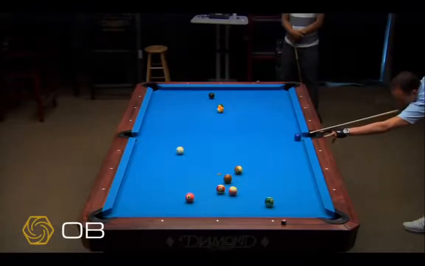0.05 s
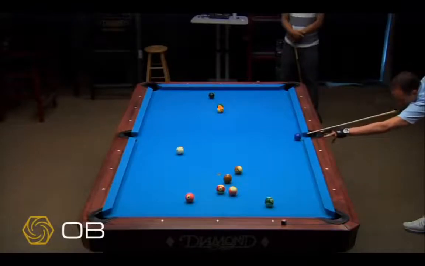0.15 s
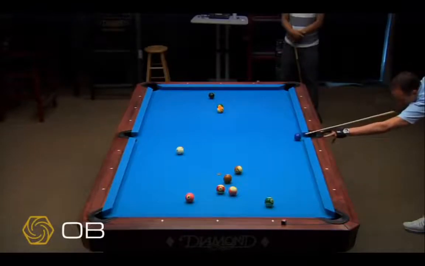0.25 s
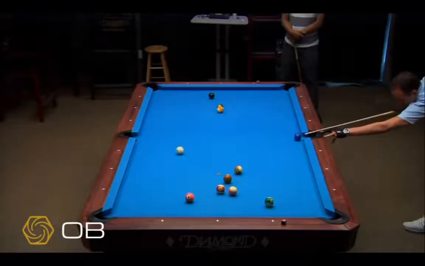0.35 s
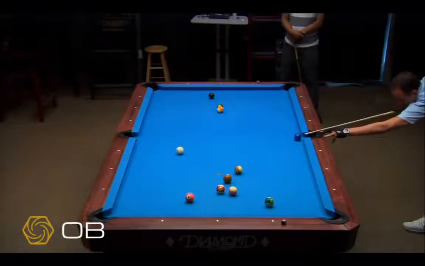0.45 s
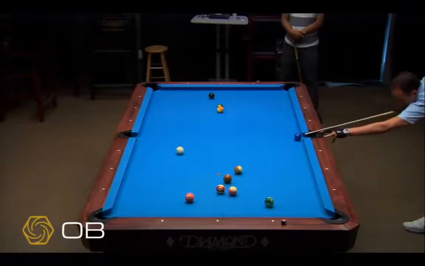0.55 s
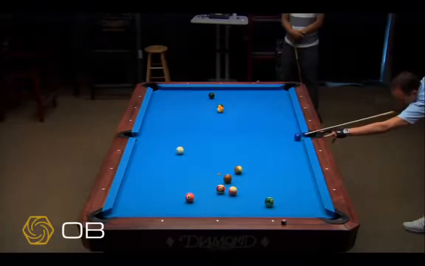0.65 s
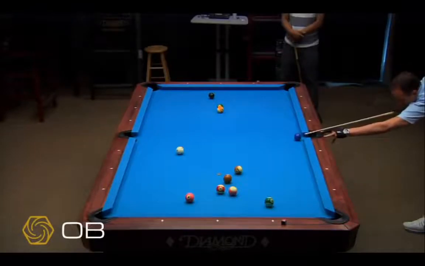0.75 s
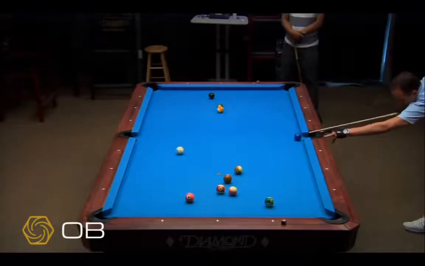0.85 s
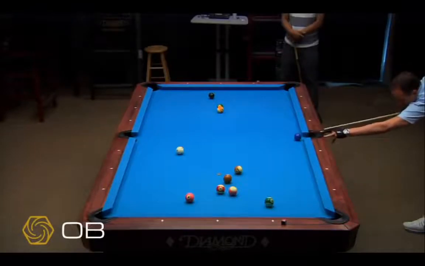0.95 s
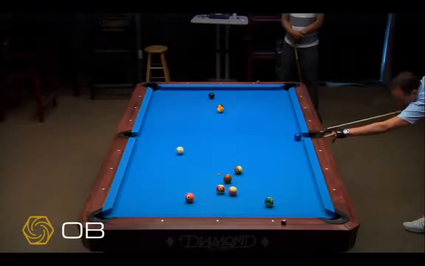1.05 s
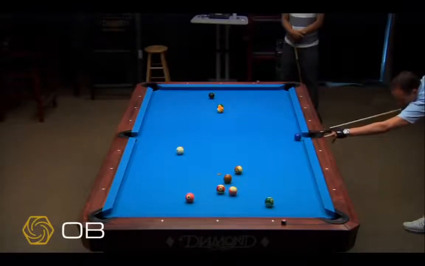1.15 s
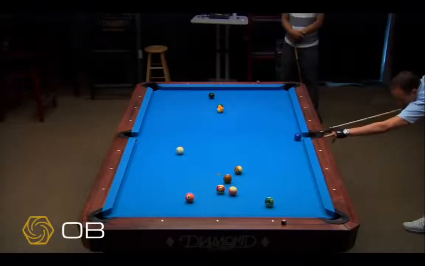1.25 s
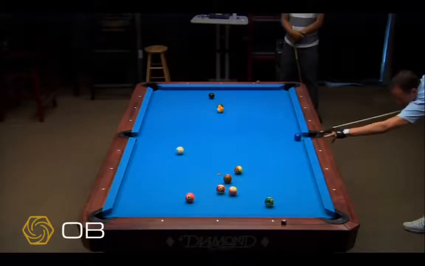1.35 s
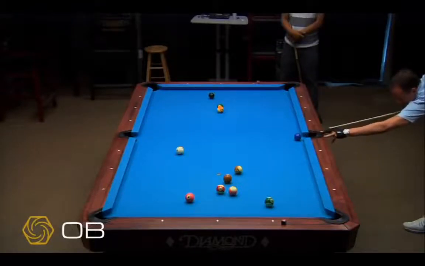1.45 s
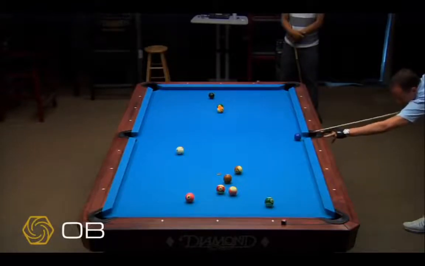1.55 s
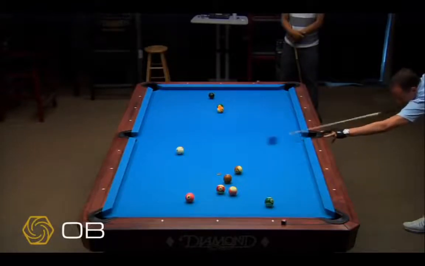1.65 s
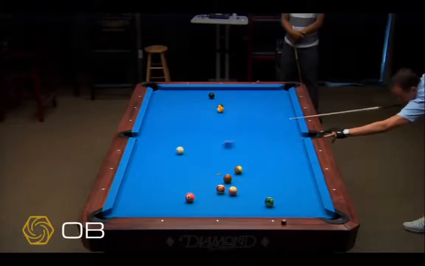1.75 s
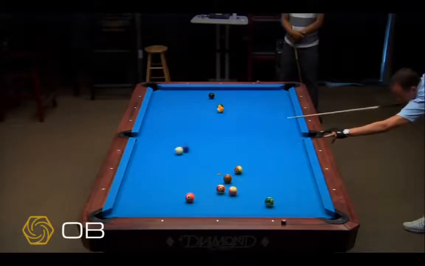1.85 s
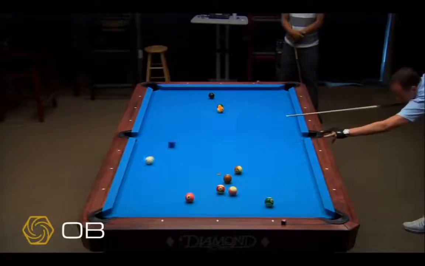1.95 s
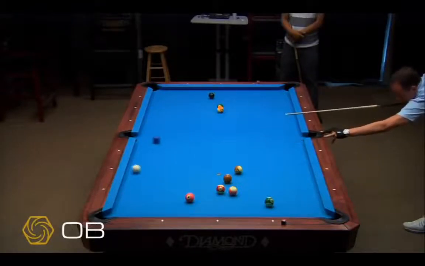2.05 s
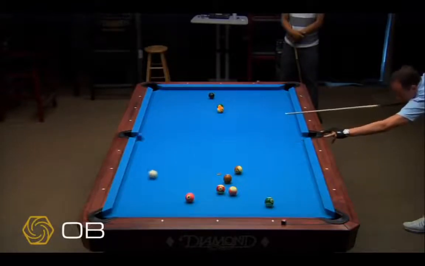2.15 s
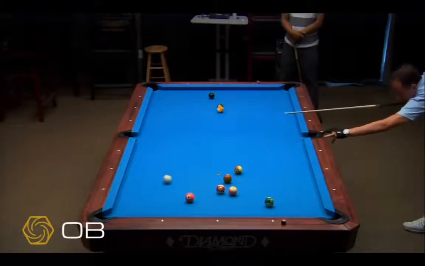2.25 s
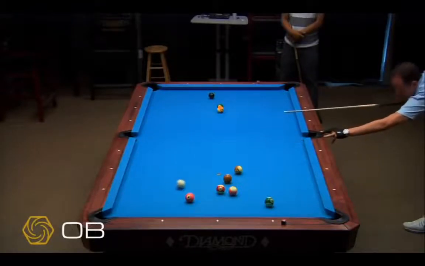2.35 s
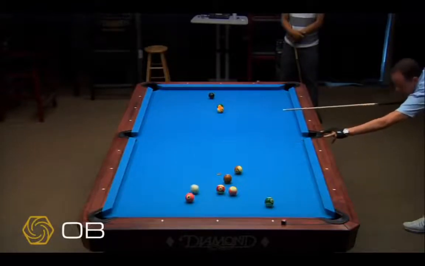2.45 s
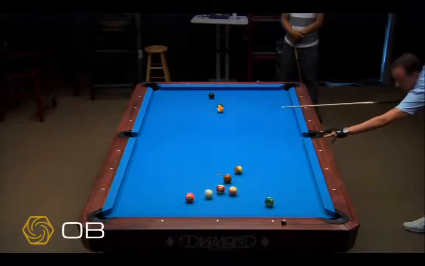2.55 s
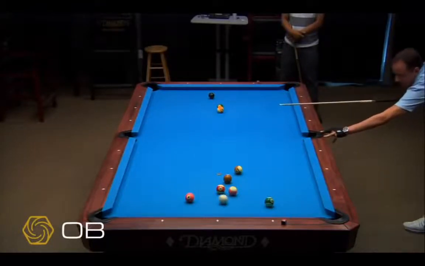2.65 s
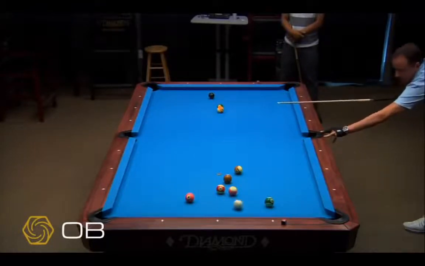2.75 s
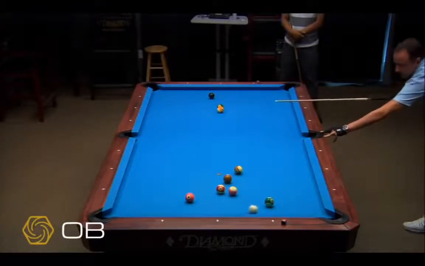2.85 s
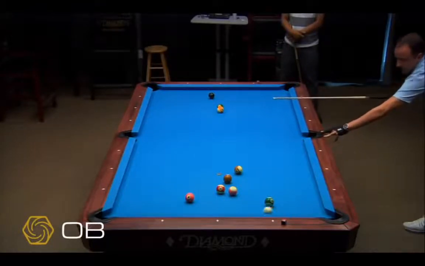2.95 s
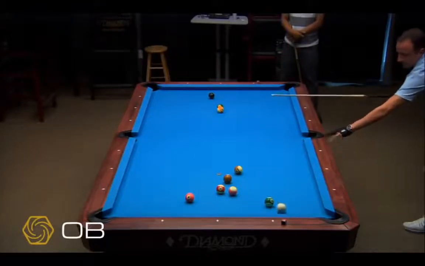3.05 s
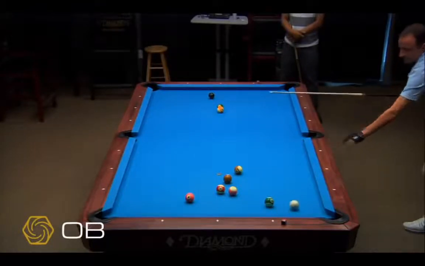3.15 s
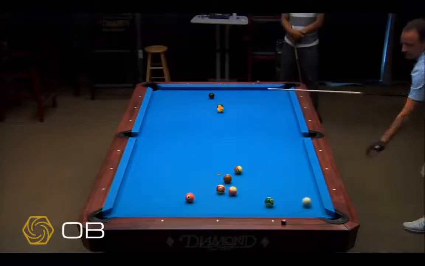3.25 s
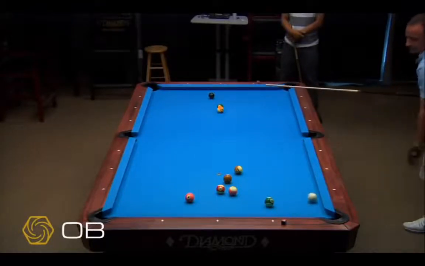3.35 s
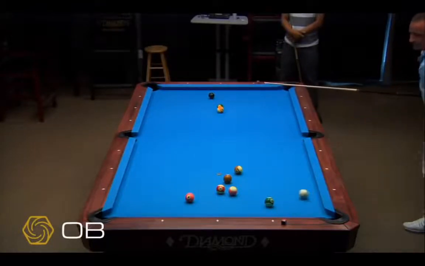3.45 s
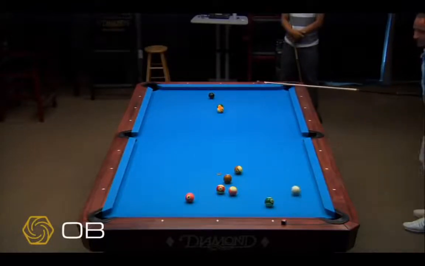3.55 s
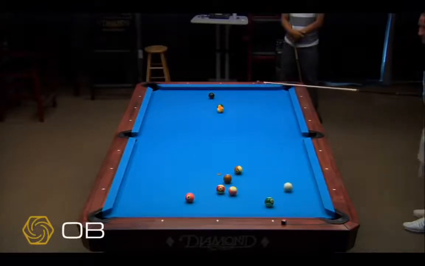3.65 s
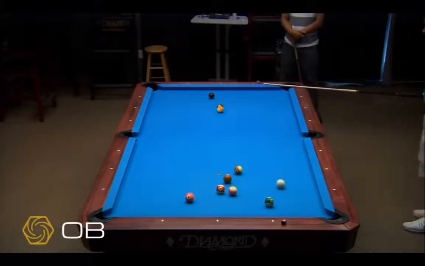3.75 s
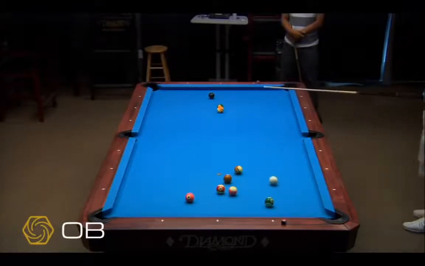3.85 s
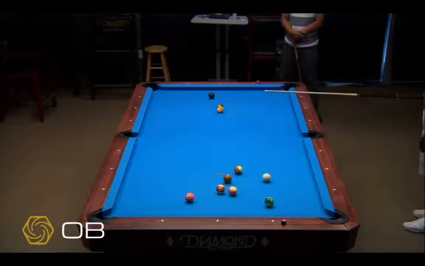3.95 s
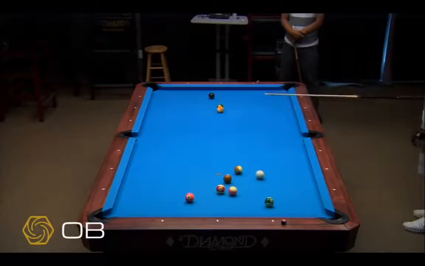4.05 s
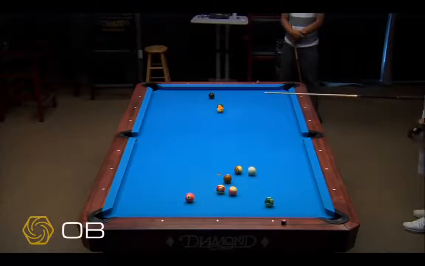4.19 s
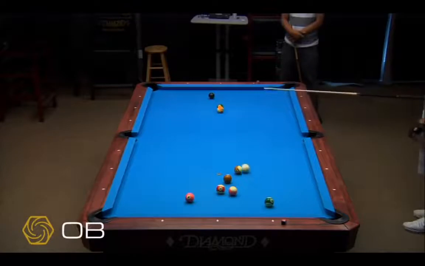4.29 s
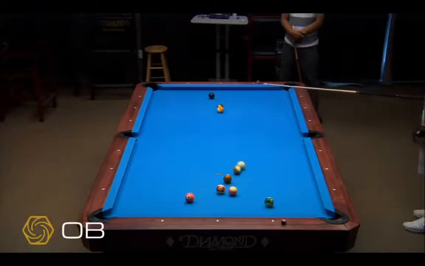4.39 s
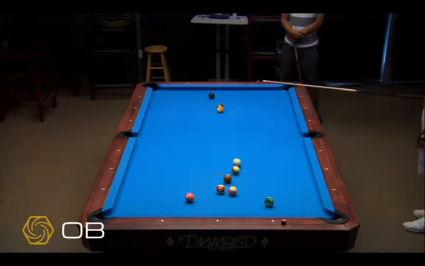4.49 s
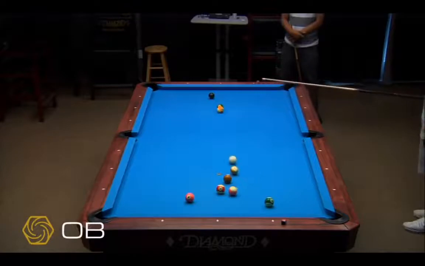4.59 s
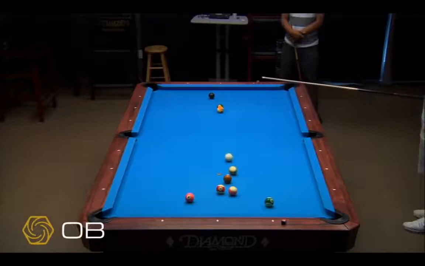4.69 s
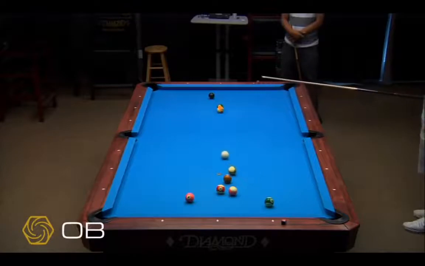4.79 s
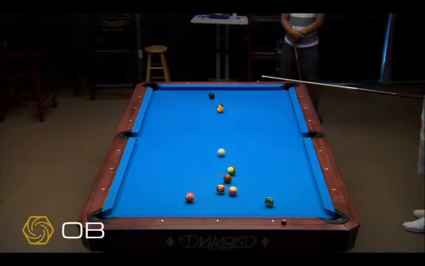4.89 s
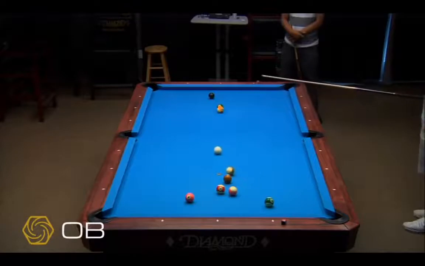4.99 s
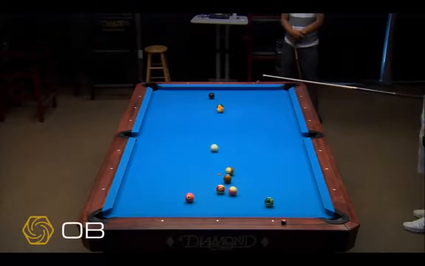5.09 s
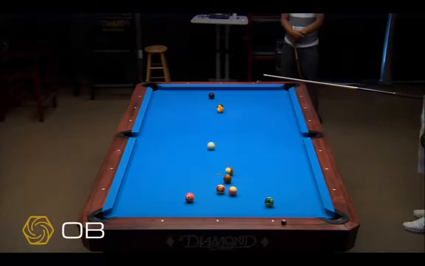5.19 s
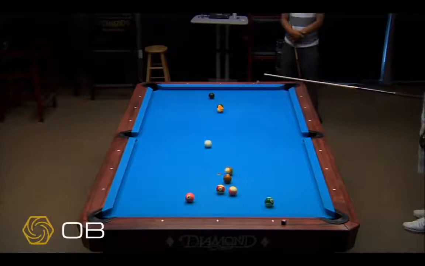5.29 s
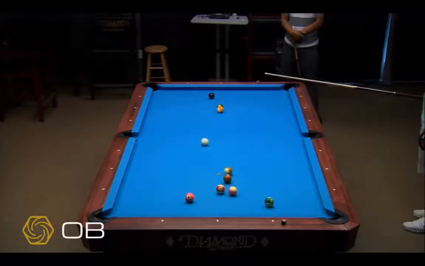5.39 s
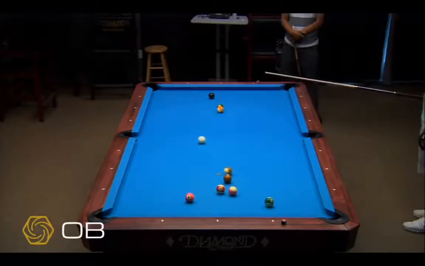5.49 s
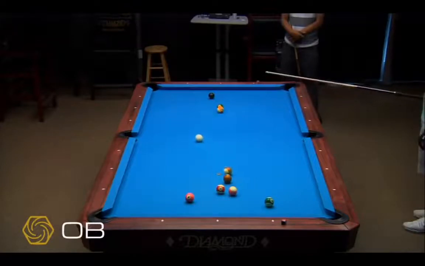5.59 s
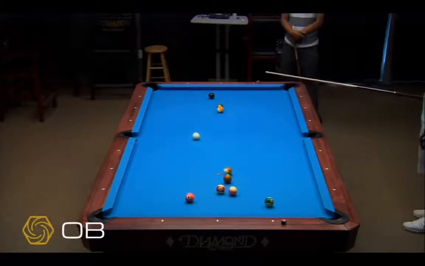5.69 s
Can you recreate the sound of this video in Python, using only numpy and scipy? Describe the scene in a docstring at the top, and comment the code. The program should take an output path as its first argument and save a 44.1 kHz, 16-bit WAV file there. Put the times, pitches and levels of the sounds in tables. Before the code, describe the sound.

Fabric scrapes and snaps right against a clip-on shirt microphone, then a cue hits a pool ball, followed at once by a bright clack of ball on ball. Hollow wooden knocks and a low rumble follow as a ball falls into the pocket and travels through the table. It settles in the tray with soft clacks and a hollow tone, before a last faint click. Quiet room air and electrical hum lie underneath.

```python
"""A pool room heard through a small microphone worn on a player's shirt. Air hush and mains hum run throughout.
First cloth rustles, squeaks and ticks against the capsule by stick-slip friction. At 1.8 s the cue strikes
and its shaft rings; just after 2 s two balls clack. Meanwhile a ball starts to knock and rumble, into the
pocket and down the wooden return, driving the table's modes until 4.3 s. Near 4.5 s come softer clacks,
two knocks and a hollow ring as it lands in the tray; one faint clack follows at 5.5 s."""
import sys
import numpy as np
from scipy import signal
from scipy.fft import rfft, irfft
from scipy.io import wavfile
from scipy.ndimage import uniform_filter1d

SR = 44100
rng = np.random.default_rng(int(sys.argv[2]) if len(sys.argv) > 2 else 0)


def transcribe(signal):
    """Save signal, clipped to [-1, 1], as a 16-bit WAV file at the path in sys.argv[1]."""
    frames = np.atleast_2d(signal).T
    limited = np.clip(frames, -1, 1)
    pcm = np.round(limited * 32767).astype(np.int16)
    wavfile.write(sys.argv[1], SR, pcm)


N = 252693


def undb(db):
    """Amplitude ratio of a level in decibels."""
    return 10 ** (np.asarray(db) / 20)


def unit(x):
    """Normalisation to a peak of 1."""
    return x / np.max(np.abs(x))


def rms(x, db):
    """Normalisation to an RMS level."""
    return x * undb(db) / np.sqrt(np.mean(x ** 2))


def add(track, start, x):
    """Superposition: x joins the track at start seconds."""
    i = max(int(start * SR), 0)
    track[i:i + len(x)] += x[:N - i]


def band(x, lo_hz, hi_hz):
    """Butterworth band-pass filtering."""
    sos = signal.butter(2, [lo_hz, min(hi_hz, .45 * SR)], "bandpass", fs=SR, output="sos")
    return signal.sosfilt(sos, x)


def ring(x, modes):
    """Modal superposition: damped resonators of alternating sign, driven by x."""
    out = 0
    for k, (hz, db, t60) in enumerate(modes):
        pole = np.exp(2j * np.pi * hz / SR - np.log(1000) / (t60 * SR))
        out = out + (-1) ** k * undb(db) * signal.lfilter([1], [1, -pole], x).imag
    return out


def colour(x, points):
    """Spectral shaping by (frequency [Hz], gain [dB]) points."""
    hz, db = np.transpose(points)
    bins_hz = np.arange(len(x) // 2 + 1) * SR / len(x) + 1
    return irfft(rfft(x) * undb(np.interp(np.log(bins_hz), np.log(hz), db)), len(x))


def drift(rate_hz):
    """Smoothed random steps: a slow fluctuation with spread near 1."""
    hold = int(SR / rate_hz)
    steps = np.repeat(rng.standard_normal(N // hold + 1), hold)
    return 1.2 * uniform_filter1d(uniform_filter1d(steps, hold), hold)[:N]


def swell(t, rise, t60):
    """Exponential build-up with time constant rise, and decay by 60 dB in t60 seconds."""
    return (1 - np.exp(-t / max(rise, 1e-4))) ** 2 * np.exp(-np.log(1000) * t / max(t60, 1e-3))


def burst(t, rise, t60):
    """A transient of white noise that builds up and decays."""
    return rng.standard_normal(len(t)) * swell(t, rise, t60)


# spectrum of the room's air noise (frequency [Hz], relative density [dB])
AIR_SPECTRUM = [(30, -16.5), (80, -13), (140, -9.5), (190, -13), (230, -23.5), (330, -20), (450, -27),
                (1000, -26.5), (1300, -42), (2200, -37.5), (3000, -45.5), (4700, -49.5), (7500, -41.5),
                (10000, -49.5), (13000, -43.5), (15700, -46), (16200, -70)]
def hush():
    """Ambient noise: broadband, strongest in the bass, drifting slightly in level."""
    air = colour(rng.standard_normal(N), AIR_SPECTRUM)
    air = air * undb(-73) / np.std(band(air, 190, 16000))
    return air * undb(.9 * drift(3.4))


HUM_HZ, HUM_DB = 118.5, -64
def hum():
    """Mains hum: one sinusoid under slight random frequency and amplitude modulation."""
    phase = 2 * np.pi * np.cumsum(HUM_HZ + .5 * drift(4)) / SR
    return rms(np.sin(phase) * undb(1.2 * drift(4)), HUM_DB)


# cloth sliding past the capsule, one contour a slide (time [s], level [dB])
SLIDES = [
    [(0, -64.5), (.14, -71), (.155, -80), (.24, -62), (.28, -67), (.56, -77), (.66, -99)],
    [(.82, -95), (.93, -77), (.96, -57), (.995, -56), (1.01, -75), (1.06, -75), (1.09, -99)],
    [(1.275, -74), (1.345, -53.5), (1.38, -69.5), (1.4, -55), (1.49, -69.5), (1.55, -57.5), (1.565, -65),
     (1.62, -69.5), (1.68, -95)],
]
# spectrum of cloth friction (frequency [Hz], relative density [dB])
CLOTH_SPECTRUM = [(900, -27.5), (1400, -10), (2300, -6.5), (3000, -16), (4400, -25.5), (5500, -8),
                  (6400, -1.5), (8500, -1.5), (10000, -16), (11600, -3.5), (14000, -3), (15800, -8.5),
                  (16500, -21.5)]
# ranges of fibres that catch independently (band edge [Hz])
FIBRE_EDGES = [700, 1700, 3200, 5300, 7400, 10000, 13000, 17000]
SNAGS_PER_S, SNAG_DB, SNAG_T60_S = 80, 8, .01
PATCHY_DB, PATCHES_PER_S = 1.6, 45
def rustle():
    """Stick-slip friction: fibres catch and release, making a grainy hiss with scattered snags."""
    out = np.zeros(N)
    for contour in SLIDES:
        times, db = np.transpose(contour)
        t = np.arange(times[0], times[-1], 1 / SR)
        grain = undb(1.6 * np.repeat(rng.exponential(size=len(t) // 40 + 1), 40)[:len(t)])
        catches = (rng.random(len(t)) < SNAGS_PER_S / SR) * rng.random(len(t)) * undb(SNAG_DB)
        snags = signal.lfilter([1], [1, -1000 ** (-1 / (SNAG_T60_S * SR))], catches)
        hiss = colour((grain + snags) * rng.standard_normal(len(t)), CLOTH_SPECTRUM)
        patchy = sum(undb(PATCHY_DB * drift(PATCHES_PER_S)[:len(t)]) * band(hiss, lo, hi)
                     for lo, hi in zip(FIBRE_EDGES, FIBRE_EDGES[1:]))
        add(out, times[0], undb(np.interp(t, times, db)) * rms(patchy, 0))
    return out


# taut threads (time [s], duration [s], start frequency [Hz], end frequency [Hz], level [dB])
THREAD_SQUEAKS = [(0, 0.12, 7036, 7160, -66.5), (0, 0.117, 11350, 11460, -66),
                  (0.197, 0.088, 11400, 11800, -69), (0.194, .42, 6226, 6100, -89),
                  (0.955, 0.048, 12480, 11100, -60), (1.282, 0.096, 5800, 6700, -66.5),
                  (1.36, 0.21, 11110, 11010, -64.5), (1.504, .07, 6557, 6870, -69)]
ARCH_PER_S, HALF_WIDTH_HZ = .27, 130
def squeaks():
    """Tension sets a thread's pitch: narrow-band noise rides an arching glide as the thread tightens."""
    out = np.zeros(N)
    for start, duration, start_hz, end_hz, db in THREAD_SQUEAKS:
        progress = np.linspace(0, 1, int(duration * SR))
        arch = 1 + ARCH_PER_S * duration * np.sin(np.pi * progress)
        glide_hz = (start_hz + (end_hz - start_hz) * progress) * arch
        carrier = np.sin(2 * np.pi * np.cumsum(glide_hz) / SR)
        squeak = band(rng.standard_normal(len(carrier)), 5, HALF_WIDTH_HZ) * carrier
        add(out, start, signal.windows.tukey(len(squeak), .3) * rms(squeak, db))
    return out


# cloth or a button snapping on the capsule
# (time [s], level [dB], ring frequency [Hz], thump gain [dB], knock gain [dB])
SNAPS = [(0.0207, -44.5, 7000, -25, -39), (0.052, -48, 7000, -6, -13), (0.0772, -55, 11800, -23, -22),
         (0.1014, -58, 8000, -18, -30), (0.1404, -31.5, 6600, 0.5, -11), (0.2335, -43.5, 8200, -25, -42),
         (0.3159, -47.5, 14600, -30, -23), (0.333, -64, 7100, -24, 2), (0.961, -39, 7400, -7, -30),
         (0.9778, -40.5, 7000, -3.5, -17), (0.9893, -44.5, 11500, -25, -11), (1.2444, -22, 7700, -8, -17.5),
         (1.2553, -20.5, 8800, -3.5, -23), (1.284, -45, 10400, -21, -18), (1.3079, -44, 6000, -16, -18),
         (1.3409, -33.5, 6900, -34, -23), (1.3667, -41.5, 6560, -31, -26.5),
         (1.3804, -48.5, 11100, -19, -5.5), (1.4063, -15.5, 6500, -24.5, -16),
         (1.4197, -27, 12500, -3, -20.5), (1.4436, -41.5, 11700, -29, -21), (1.5199, -37, 6900, -14, -21.5),
         (1.8315, -16.5, 7600, -25, -16.5)]
# modes of the capsule housing (frequency [Hz], gain [dB], T60 [s])
CAPSULE_MODES = [(1900, -10, 0.043), (2460, -3, 0.014), (6790, -8.5, 0.019), (8620, 5.5, 0.0014),
                 (12685, -2.5, .004), (14400, -6.5, 0.0039)]
def ticks():
    """Impulse excitation: a brief crack rings the housing; the membrane swings out in a damped thump."""
    out, t = np.zeros(N), np.arange(SR // 10) / SR
    thump = np.sin(2 * np.pi * 102 * t) * swell(t, rise=.00033, t60=.036)
    for start, db, hz, thump_db, knock_db in SNAPS:
        crack = burst(t, rise=.00042, t60=.008)
        bright = unit(band(crack, 6000, 23000)) + 2.4 * unit(ring(crack, [(hz, 0, .003)]))
        bright += 1.8 * unit(ring(crack, CAPSULE_MODES[2:]))
        knock = unit(ring(crack, CAPSULE_MODES[:2]))
        knock += 1.1 * unit(band(crack, 390, 1100)) + .31 * unit(band(crack, 2800, 4600))
        add(out, start, undb(db) * (unit(bright) + undb(knock_db) * knock + undb(thump_db) * thump))
    return out


# the cue striking the ball (time [s], peak level [dB])
CUE_STROKES = [(1.803, -11)]
# modes of shaft and butt (frequency [Hz], gain [dB], T60 [s])
CUE_MODES = [(75, -11, .3), (150, -15, .2), (258, -22, .2), (334, -23, .15), (525, -11, .12), (718, -6, .1),
             (888, 1, .1), (1066, -11, .08), (1255, -12, .07), (1636, -12, .09), (1908, -8, .06),
             (2230, -1, .024), (3070, -9, .02), (3420, 2, .022)]
def cue():
    """Free vibration: two opposite pulses from the leather tip, each under 1 ms, set the shaft ringing."""
    out, t = np.zeros(N), np.arange(SR // 2) / SR
    push = .5 * np.exp(-((t - .0005) / .0001) ** 2) - np.exp(-((t - .0017) / .0001) ** 2)
    shaft = unit(ring(push, CUE_MODES))
    for start, db in CUE_STROKES:
        crack = band(burst(t, rise=.0029, t60=.06), 1800, 16000)
        add(out, start, undb(db) * unit(shaft + .059 * unit(crack)))
    return out + undb(-19.5) * room(out)


# reverberation of the room (band frequency [Hz], T60 [s], gain [dB])
ROOM_BANDS = [(125, 0.26, -1.5), (250, 0.69, -0.5), (480, 0.37, 0.5), (930, 0.35, -6.5), (2040, 0.28, -1.5),
              (3200, 0.087, -6), (5100, .35, -4), (8000, .25, -14), (13000, 0.078, -9)]
def room(x):
    """Diffuse reverberation: convolution with noise that decays at its own rate in each band."""
    t = np.arange(SR // 2) / SR
    tail = sum(undb(db) * swell(t, .0013, t60) * band(rng.standard_normal(len(t)), hz / 1.5, hz * 1.35)
               for hz, t60, db in ROOM_BANDS)
    return signal.fftconvolve(x, rms(tail, 0) / np.sqrt(len(t)))[:N]


# modes of the table's wooden body (frequency [Hz], gain [dB], T60 [s])
BODY_MODES = [(78.7, -7, 0.7), (105, -4, 0.36), (142, 2, 0.26), (170.7, 2, 0.27), (220.8, -0.5, 0.086),
              (328, 3, 0.051), (417, -4.5, .08), (474.6, -3, 0.072), (555.5, -9, 0.16), (633, -3, 0.02),
              (811, -15.5, 0.14), (873.7, -13, 0.052), (1003, -11, 0.065), (1090.7, -14, .05)]
# a ball rolling in the return (time [s], level [dB])
ROLL_CONTOUR = [(1.84, -51), (2.17, -48), (2.52, -62.5), (3.16, -58), (3.31, -76.5), (3.669, -54),
                (3.841, -68.5), (4.3, -66)]
def roll():
    """Forced vibration: uneven rolling drives the lowest modes of the wooden body."""
    times, db = np.transpose(ROLL_CONTOUR)
    force = undb(3 * drift(25)) * rng.standard_normal(N)
    envelope = undb(np.interp(np.arange(N) / SR, times, db, left=-120, right=-120))
    return rms(ring(force, BODY_MODES[:7]), 0) * envelope


# a ball against cushion, pocket and return
# (time [s], level [dB], bass gain [dB], edge gain [dB], rattle T60 [s])
BLOWS = [(1.849, -35, -11.5, -44, 0.63), (2.245, -55, 14, -14, 0.098), (2.29, -59, 17, -12, 0.083),
         (2.34, -67, 19, -20, 0.073), (2.406, -47.5, -1, -47.5, 0.18), (2.468, -43.5, -1.5, -4.5, 0.12),
         (2.565, -49, -21, -15, 0.235), (2.643, -48.5, 0, -29, 0.22), (2.668, -36, 0.5, -13, 0.2),
         (2.713, -36.5, -3.5, -14, .2), (2.747, -41, -6, -17.5, 0.53), (2.894, -40, -18.5, -22, 0.63),
         (3.038, -29, -0.5, -33, 0.18), (3.053, -27.5, -3.5, -16.5, 0.17), (3.133, -33, 3, -31.5, 0.34),
         (3.442, -30, 1, -37, .1), (3.451, -28, -1.5, -18, 0.17), (3.463, -28, 2.5, -20, 0.34),
         (3.555, -30.5, -6.5, -35, .25), (3.61, -43, -20.5, -15.5, 0.43), (4.549, -46.5, -13, -9, 0.22),
         (4.561, -37, -9.5, -5.5, .42)]
RATTLE_RISE_S, FIRST_BLOW_GAIN, BASS_T60_SHARE = .0037, 2.5, .58
def knocks():
    """Repeated impact: each blow ticks, then a dying rattle of bumps excites the body's modes."""
    out, t = np.zeros(N), np.arange(SR // 2) / SR
    for start, db, bass_db, edge_db, t60 in BLOWS:
        envelope = swell(t, RATTLE_RISE_S, t60) + FIRST_BLOW_GAIN * swell(t, .0005, .015)
        bumps = rng.standard_normal(len(t)) * envelope
        # the heavy panels feel only the early bumps
        bass = ring(bumps * swell(t, 1e-4, BASS_T60_SHARE * t60), BODY_MODES[:5])
        mid = ring(bumps, BODY_MODES[5:])
        tick = burst(t, rise=.0003, t60=.012)
        chatter = .33 * burst(t, RATTLE_RISE_S, .79 * t60)
        edge = band(tick + chatter, 1600, 2600) + .4 * band(tick + .4 * chatter, 2500, 3690)
        edge += .15 * band(tick + .5 * chatter, 5500, 9500)
        knock = undb(bass_db) * unit(bass) + unit(mid) + undb(edge_db) * unit(edge)
        add(out, start - .001, undb(db) * knock)
    return out


# ball on ball (time [s], peak level [dB], send to echoes and room [dB], upper cutoff [Hz])
COLLISIONS = [(2.0625, -19.5, -3.5, 16000), (4.507, -60, -16, 3500), (4.532, -40.5, -16, 3000),
              (5.51, -61, -14, 4500)]
# resonances of the click (frequency [Hz], gain [dB], T60 [s])
CLICK_MODES = [(1010, -14.5, 0.0051), (2046, 3, 0.005), (2255, 7.5, 0.0023), (2934, -1, 0.003),
               (4000, -24, 0.0044), (7640, -20.5, 0.0019), (14960, -21, 0.0015)]
# early reflections from slate and rail, then ceiling (delay [s], gain [dB])
REFLECTIONS = [(.0035, -2), (.0138, -6)]
def clacks():
    """Elastic collision of resin balls: softer contacts last longer and so sound duller."""
    near, room_send = np.zeros(N), np.zeros(N)
    ringing = ring(signal.unit_impulse(SR // 50), CLICK_MODES)
    for start, db, send_db, top_hz in COLLISIONS:
        click = unit(band(ringing, 400, top_hz))
        arrival = start + .0005
        add(near, arrival, undb(db) * click)
        for delay, echo_db in REFLECTIONS:
            echo = band(click, 400, 9000 - 3e5 * delay)  # later echoes are duller
            add(near, arrival + delay, undb(db + send_db + echo_db) * echo)
        add(room_send, start, undb(db + send_db) * click)
    return near + undb(-1) * room(room_send)


# a ball landing and bouncing in the tray (time [s], peak level [dB], T60 [s])
LANDINGS = [(4.574, -43, .16), (4.655, -46, .75)]
TRAY_HZ, TRAY_RISE_S = 188, .008
def tray():
    """Damped resonance: each landing rings one hollow mode of the tray."""
    out, t = np.zeros(N), np.arange(SR) / SR
    tone = np.sin(2 * np.pi * TRAY_HZ * t)
    for start, db, t60 in LANDINGS:
        add(out, start, undb(db) * unit(swell(t, TRAY_RISE_S, t60) * tone))
    return out


def scene():
    """Linear superposition in one channel; knocks and tray share one reverberation."""
    background = hush() + hum()
    shirt = rustle() + squeaks() + ticks()
    wood = knocks() + tray()
    game = cue() + roll() + wood + undb(-17.5) * room(wood) + clacks()
    return (background + shirt + game)[None]


BASS_CUT_HZ, TOP_CUT_HZ = 70, 16500
def record(dry):
    """Band limiting: the microphone drops the deep bass; the recorder cuts the top."""
    thin = signal.sosfilt(signal.butter(4, BASS_CUT_HZ, "highpass", fs=SR, output="sos"), dry)
    return signal.sosfilt(signal.ellip(10, .2, 70, TOP_CUT_HZ, fs=SR, output="sos"), thin)


dry = scene()
out = record(dry)
transcribe(out)
```